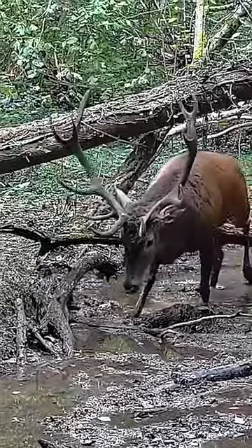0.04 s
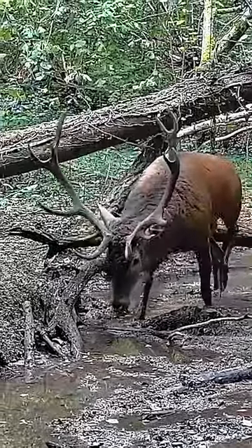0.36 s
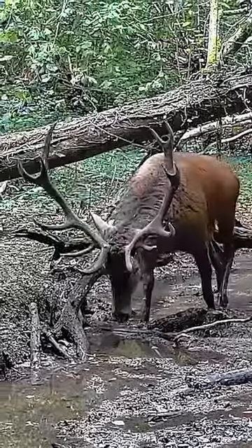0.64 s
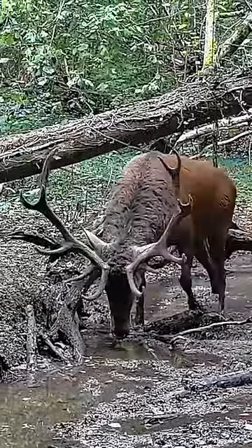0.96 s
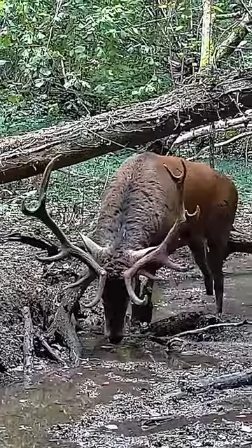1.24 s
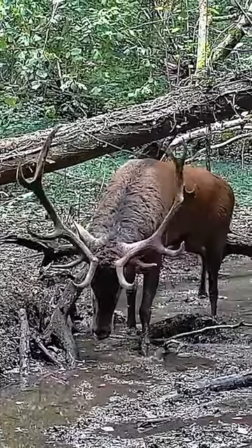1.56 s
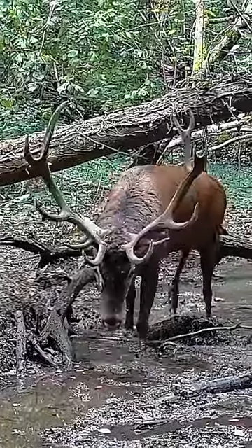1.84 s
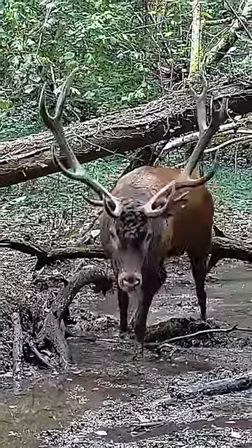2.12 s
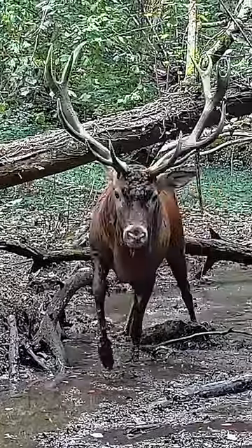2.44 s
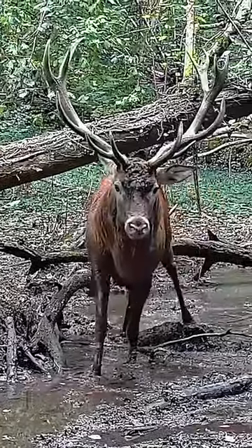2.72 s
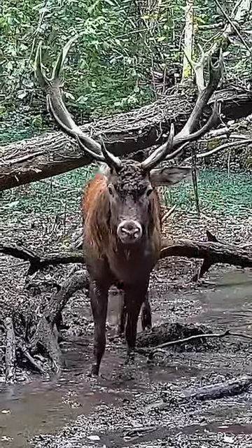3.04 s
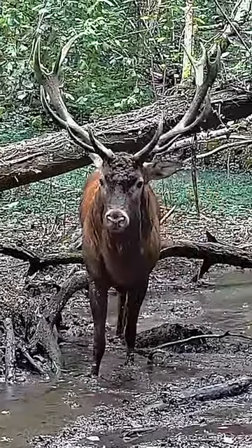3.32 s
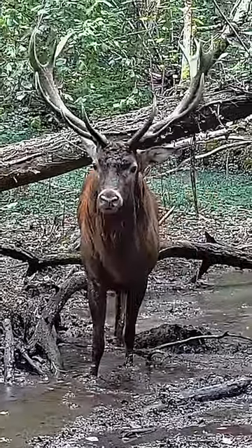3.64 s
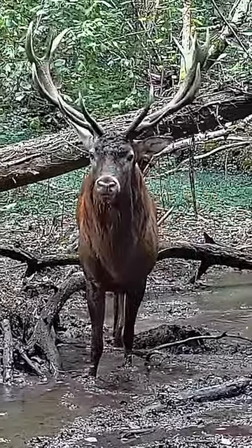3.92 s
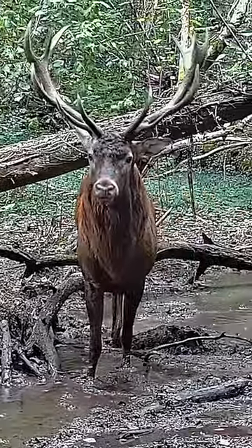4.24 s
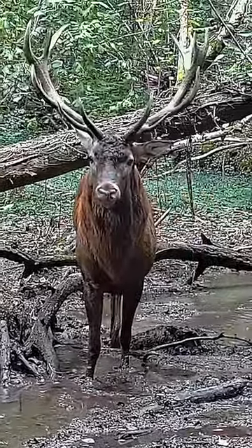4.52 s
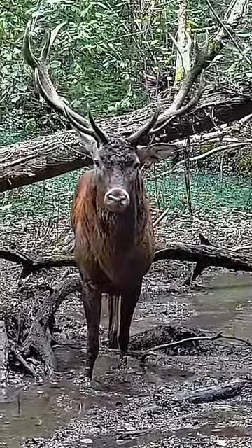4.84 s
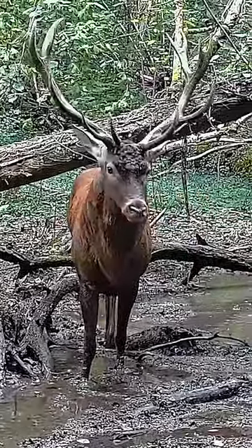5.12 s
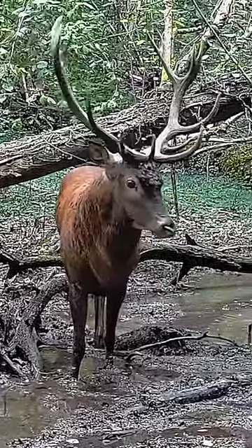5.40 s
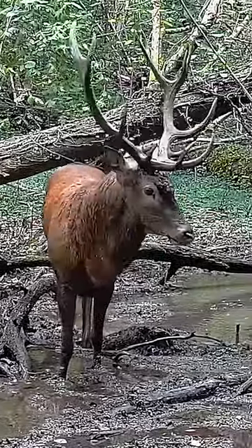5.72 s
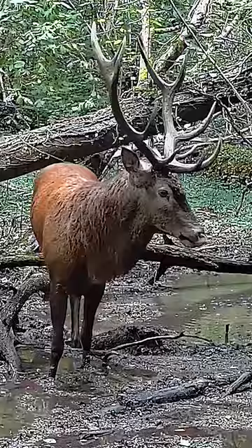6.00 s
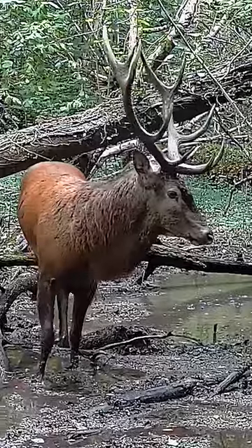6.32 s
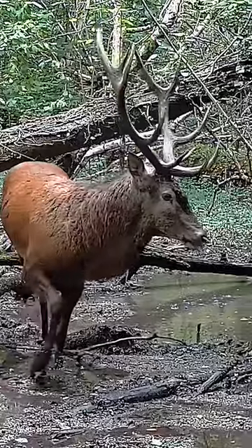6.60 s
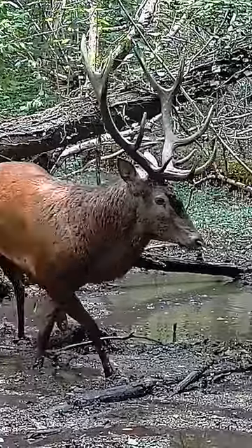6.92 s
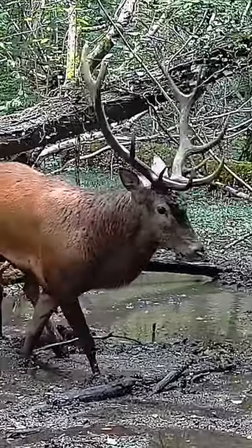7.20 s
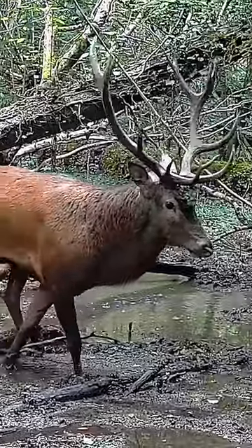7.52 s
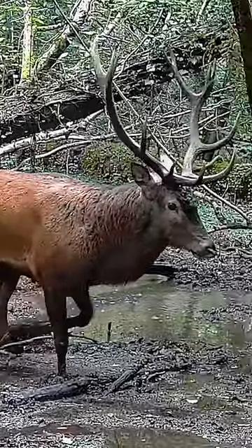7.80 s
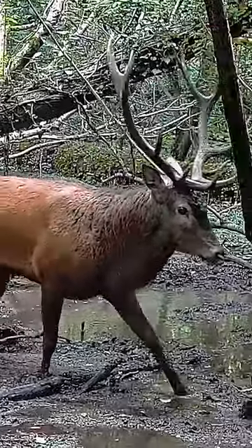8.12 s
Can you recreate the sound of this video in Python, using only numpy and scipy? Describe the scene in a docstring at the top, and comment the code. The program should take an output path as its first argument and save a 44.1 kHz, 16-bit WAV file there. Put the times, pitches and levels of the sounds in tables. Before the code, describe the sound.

A stag wades through shallow muddy water in a forest, its hooves making short wet squelches, bubbly pops and sharp smacks while droplets tick around them. After about three seconds it stands still, leaving a faint fizz of settling mud and a soft far rumble with a slight hum. Then a hoof plunges in, knocking on a sunken branch, and the squelching steps resume. The steps sound fairly close, with a slight echo off the trees.

```python
"""Over a far rumble and a faint hum, a stag wades through shallow forest mud for three seconds.
Each squelch is a cloud of small bubbles that flings spray and leaves the mud fizzing. Hooves plunge,
air pockets pop, drops tick and a flat hoof smacks, all echoing off the tree trunks.
Then the stag stands still and the mud settles. At 6.6 s it walks off,
knocking a hoof on a sunken branch as it starts."""
import sys
import numpy as np
from scipy import signal
from scipy.fft import rfft, irfft
from scipy.io import wavfile

SR = 44100
rng = np.random.default_rng(int(sys.argv[2]) if len(sys.argv) > 2 else 0)


def unload_wav(signal):
    """Save mono or channel-first audio to the path in sys.argv[1] as 16-bit WAV at rate SR, clipped to [-1, 1]."""
    wavfile.write(
        sys.argv[1],
        SR,
        np.round(np.clip(np.atleast_2d(signal).T, -1, 1) * 32767).astype(np.int16),
    )


N = 359415
TIME = np.arange(N) / SR


def undb(db):
    """Turn decibels into a number to multiply by."""
    return 10 ** (np.asarray(db) / 20)


def level(x, db):
    """Set a sound's average (rms) level."""
    return x * undb(db) / np.sqrt(np.mean(x ** 2) + 1e-20)


def curve(rows):
    """Join (time, value) rows by straight lines."""
    return np.interp(TIME, *np.transpose(rows))


def add(out, s, sound):
    """Mix a sound in at s seconds."""
    start = int(np.clip(s * SR, 0, N - 1))
    out[start:start + len(sound)] += sound[:N - start]


def colour(x, points):
    """Turn lows and highs up or down along points of f/Hz, level/dB."""
    hz, db = np.transpose(points)
    bins = np.maximum(np.fft.rfftfreq(x.shape[-1], 1 / SR), 1)
    gain = undb(np.interp(np.log(bins), np.log(hz), db))
    return irfft(rfft(x) * gain, x.shape[-1])


def wander(rate):
    """Drift by about 1 either way, to a new random value `rate` times a second."""
    knots = rng.standard_normal(N // 100)
    return np.interp(TIME * rate, np.arange(len(knots)), knots)


def bubble(hz, ring_s, glide):
    """A bubble opens and rings away, its pitch rising as it nears the surface; peak 1."""
    t = np.arange(int(7 * ring_s * SR) + 8) / SR
    pitch = np.minimum(hz * (1 + glide * np.tanh(t / ring_s / 2)), SR / 2)
    opening_s = min(1.1 / hz, ring_s / 2)
    swell = (1 - np.exp(-(t / opening_s) ** 2)) * np.exp(-t / ring_s)
    return swell / swell.max() * np.sin(2 * np.pi * np.cumsum(pitch) / SR)


def cloud(length, hz, octaves, rate, cycles, scatter_db, most=300):
    """A burst of small, varied bubbles that swells fast and fades slowly; rms 1 over its length."""
    count = int(np.clip(rate * length, 8, most))
    chance = rng.standard_normal((most, 4))
    out = np.zeros(int(length * SR) + SR // 10)
    for k, (late, pitch, size, ring) in enumerate(chance[:count]):
        place = (k + .5 + .5 * np.tanh(late)) / count
        grain_hz = hz * 2 ** (octaves * 2 * np.tanh(pitch / 2))
        grain = bubble(grain_hz, cycles * 2 ** (ring / 2) / grain_hz, glide=0.074)[:SR // 10]
        swell = np.sin(np.pi * place ** 0.43)
        # high bubbles die sooner, so they start stronger
        gain = undb(scatter_db * np.tanh(size)) * np.sqrt(swell * grain_hz / hz)
        add(out, place * length, np.sign(late) * gain * grain)
    return out / np.sqrt(np.sum(out ** 2) / (length * SR))


# how strong the rumble's lows and highs are against each other: f/Hz, level/dB
RUMBLE_TONE = [(15, -76), (25, -43), (64, -21), (79, -17.5), (92, -2), (281, -1.5), (327, -2), (362, -1),
               (391, -4.5), (456, -4), (545, -6.5), (1710, -13), (5530, -28.5), (8970, -36.5), (11000, -69),
               (14300, -89), (22000, -120)]
# how the rumble rises and falls (only the changes count): t/s, level/dB
RUMBLE_SWELL = [(0, -47), (1.5, -45.5), (3.3, -47.5), (4.8, -48.5), (6.2, -48), (8.15, -47)]
# how loud the hum is: t/s, level/dB
HUM_LEVELS = [(0, -50.5), (1.7, -58), (3.9, -53), (5.1, -63), (6.4, -67), (8.15, -52.5)]


def forest(rumble_db=-48, hum_hz=362.3):
    """A soft, far rumble with a wavering hum in it."""
    swell = curve(RUMBLE_SWELL)
    rumble = level(colour(rng.standard_normal(N), RUMBLE_TONE), rumble_db)
    pitch = hum_hz * (1 + .004 * wander(6))
    hum = np.sqrt(2) * np.sin(2 * np.pi * np.cumsum(pitch) / SR)
    rumble *= undb(swell - np.percentile(swell, 20) + 0.67 * wander(5))
    return rumble + hum * undb(curve(HUM_LEVELS) + 1.3 * wander(7))


# hooves working the mud: t/s, length/s, f/Hz, level/dB before muffling,
# splash (0 = closed suck, 1 = open splash)
SQUELCHES = [(0, 0.049, 1590, -37.5, 0.52), (.128, 0.1, 2740, -49, 0.69), (.29, 0.11, 2290, -55.5, 0.58),
             (.814, .04, 2030, -47, .1), (1.111, .07, 1540, -39, 0.22), (1.127, 0.081, 3230, -45.5, 0.15),
             (1.464, 0.057, 2680, -37, 0.98), (1.533, 0.033, 1724, -33, 0.6),
             (1.576, 0.062, 2100, -34.5, 0.56), (1.631, 0.067, 2700, -42, 0.46),
             (1.716, 0.073, 1610, -44.5, .1), (2.286, 0.057, 1770, -38.5, 0.063),
             (2.385, 0.057, 1604, -33.5, 0.12), (2.413, .02, 3080, -31, .1),
             (2.531, 0.015, 2080, -35.5, 0.32), (2.663, .016, 2580, -28.5, 0.51),
             (2.801, .028, 2120, -38.5, 0.49), (2.89, 0.064, 2370, -48.5, 0.78),
             (3.011, .12, 3350, -62, 0.48), (6.609, 0.016, 2700, -21, .45),
             (6.624, 0.042, 2280, -32.5, 0.56), (6.726, 0.017, 2540, -39.5, 0.37),
             (6.962, 0.029, 1564, -35.5, 0.81), (6.993, 0.034, 1360, -41, 0.79),
             (7.035, 0.038, 1620, -35.5, 0.36), (7.313, 0.007, 3230, -36, 0.96),
             (7.65, .012, 3520, -40.5, .8), (7.81, 0.05, 1720, -38, 0.22), (7.949, 0.086, 1700, -45, 0.39)]


def squelches(muffle_hz=4600):
    """Wet mud tears into brief bubbles, more varied in an open splash, and muffles the smallest."""
    out = np.zeros(N)
    for s, length, hz, db, splash in SQUELCHES:
        octaves = 0.17 + 0.657 * splash
        add(out, s, undb(db) * cloud(length, hz, octaves, rate=1200, cycles=3.9, scatter_db=5))
    return signal.sosfilt(signal.butter(3, muffle_hz, fs=SR, output="sos"), out)


def stirring(rest_db=-61, start_db=-50, settle_s=.45):
    """How stirred the mud is, in dB: longer, louder squelches stir it more, then it settles."""
    fade = np.exp(-TIME / settle_s)
    power = undb(rest_db) ** 2 + undb(start_db) ** 2 * fade
    for s, length, _, db, _ in SQUELCHES:
        add(power, s, length * undb(-34 + .25 * db) ** 2 * fade)
    return 10 * np.log10(power)


def fizz(ticks_per_s=5000):
    """Countless tiny bubbles fizz in the stirred mud."""
    ticks = rng.standard_normal(N) * (rng.random(N) < ticks_per_s / SR)
    hiss = colour(ticks, [(400, -34.5), (1500, 12), (3300, 11), (5000, 1.5), (7000, -2.5), (10000, -21)])
    return level(hiss, -1) * undb(stirring() + 2.6 * wander(16))


# mud pattering down from a swinging leg: t/s, length/s, average level/dB
SPATTERS = [(.216, .008, -46), (.913, 0.043, -58.5), (1.313, 0.038, -48), (1.913, 0.05, -54.5),
            (2.098, 0.0094, -53), (2.2, 0.026, -52.5), (2.256, 0.017, -48), (2.60, 0.05, -42.5),
            (2.65, .034, -38.5), (6.828, 0.03, -50.5), (7.171, .004, -51)]


def spray(drop_hz=5700):
    """Droplets flung by the splashes and shaken from the legs land with tiny ticks."""
    # spray outlasts its squelch, and a closed suck throws far less
    flung = [(s, 1.15 * length, db - 1 - 26.5 * (1 - splash)) for s, length, _, db, splash in SQUELCHES]
    out = np.zeros(N)
    for s, length, db in flung + list(SPATTERS):
        add(out, s, undb(db) * cloud(length, drop_hz, octaves=0.38, rate=2800, cycles=7.5, scatter_db=9))
    return out


# hooves sinking deep: t/s, f/Hz, peak level/dB, ring time/ms
PLUNGES = [(.001, 448, -20.5, 3.3), (6.613, 373, -27, 5.8), (6.622, 150, -32, 6.9), (6.629, 320, -22, 2.9),
           (6.965, 627, -15.5, 1.6), (6.973, 160, -27, 7.7), (6.9956, 298, -20, 3.7),
           (7.0509, 537, -19.5, 0.63)]


def plunges(slop_db=-12, slop_s=0.016, lowest_hz=95):
    """A hoof drives a big air pocket into the water, which slops shut around the leg."""
    out, t = np.zeros(N), TIME[:SR // 4]
    slop_tone = [(30, -26), (110, -3), (400, -5), (900, -33), (2500, -10.5), (8000, -43)]
    for s, hz, db, ring_ms in PLUNGES:
        slop = level(colour(rng.standard_normal(len(t)), slop_tone), slop_db)
        add(out, s, undb(db) * bubble(hz, ring_ms / 1000, glide=0.12))
        add(out, s, undb(db) * slop * np.exp(-t / slop_s))
    # a shallow puddle gives off no deep bass
    return signal.sosfilt(signal.butter(4, lowest_hz, "high", fs=SR, output="sos"), out)


# the loudest air pockets bursting in the mud: t/s, f/Hz, peak level/dB
POPS = [(.002, 1790, -19), (.170, 4200, -32), (.278, 2925, -18.5), (.827, 1920, -27.5), (.847, 1930, -27.5),
        (1.066, 603, -29), (1.101, 1730, -26.5), (1.1402, 1610, -21.5), (1.491, 1400, -25.5),
        (1.544, 1455, -17), (1.588, 5000, -24), (1.608, 3010, -20.5), (1.616, 1850, -18.5),
        (1.681, 3360, -29), (1.701, 1245, -20), (1.71, 1534, -18.5), (2.3034, 1790, -19),
        (2.365, 1500, -23.5), (2.376, 1495, -26), (2.387, 1960, -26.5), (2.409, 1470, -19.5),
        (2.419, 3190, -17), (2.534, 2650, -25.5), (2.672, 3330, -13), (2.6951, 3040, -16.5),
        (2.7092, 3370, -26), (2.7159, 3470, -6.5), (2.809, 1850, -28.5), (2.82, 2830, -24.5),
        (6.597, 4300, -30.5), (6.6126, 5840, -26), (6.620, 804, -21), (6.728, 1830, -21),
        (6.834, 2880, -22.5), (6.875, 2420, -30.5), (6.965, 1500, -21.5), (7.006, 1740, -23),
        (7.061, 1540, -23), (7.078, 4850, -28.5), (7.084, 1590, -28.5), (7.803, 2070, -29),
        (7.8266, 1310, -16), (8.019, 1070, -28), (8.060, 3740, -27.5)]


def pops(froth_db=-24, froth_s=.014, lead_s=.004):
    """Air pockets break as hooves press in and pull free; their mud skin frays just before and after."""
    out = np.zeros(N)
    for s, hz, db in POPS:
        cycles = 5.7 * (hz / 1800) ** .4  # small, high pockets ring for more cycles
        cycles *= 0.5 ** max((db + 19.5) / 18.5, 0)  # hard bursts die sooner
        add(out, s, undb(db) * bubble(hz, cycles / hz, glide=0.021))
        froth = cloud(froth_s, 0.913 * hz, octaves=0.19, rate=1500, cycles=1.72, scatter_db=8, most=40)
        add(out, s - lead_s, undb(db + froth_db) * froth)
    return out


def drips(middle_hz=2900, count=420):
    """Stray drops and lone bubbles tick all over the puddle, fading when the stag stands still."""
    out, stirred = np.zeros(N), stirring()
    calm_db = np.minimum(stirred - np.median(stirred), 0)
    for when, pitch, size, ring in rng.random((count, 4)):
        at = int(when * N)
        hz = middle_hz * 2 ** (2.4 * (pitch - .5))
        dull_db = 6 * np.log2(max(hz / middle_hz, 1))
        db = stirred[at] + 2 * calm_db[at] + 2 + 12 * size ** 2 - dull_db
        add(out, at / SR, undb(db) * bubble(hz, (2 + 4 * ring) / hz, glide=0.063))
    return out


def trunks(x, near_db=-11, near_fade_s=0.18, far_db=-19, far_fade_s=0.31):
    """Banks and logs throw back a few early echoes; standing trees add a faint tail."""
    t = TIME[:SR]
    near = rng.standard_normal(SR) ** 3 * undb(-60 * t / near_fade_s) * (t > .002)
    far = rng.standard_normal(SR) * undb(-60 * t / far_fade_s) * (1 - np.exp(-t / 0.0029))
    air = signal.butter(1, 5000, fs=SR, output="sos")
    echo = undb(near_db) * near / np.linalg.norm(near) + undb(far_db) * far / np.linalg.norm(far)
    return signal.fftconvolve(x, signal.sosfilt(air, echo))[:N]


# hooves landing flat on the wet surface: t/s, f/Hz, peak level/dB
SMACKS = [(1.476, 3130, -9.5), (6.6106, 3200, -5), (6.617, 1110, -9), (6.6632, 1680, -10),
          (7.051, 990, -19), (7.317, 6900, -17)]


def smacks(cycles=1.54):
    """Air trapped under a flat hoof escapes in one sharp snap."""
    out = np.zeros(N)
    for s, hz, db in SMACKS:
        add(out, s, undb(db) * bubble(hz, cycles / hz, glide=0.028))
    return out


# a hoof hitting the sunken branch: t/s, peak level/dB
KNOCK = (6.613, -13.5)
# the notes the branch rings with: f/Hz, relative level/dB, time to fade by 60 dB/s
BRANCH_NOTES = [(366.5, -2.5, 0.087), (849, -4, .1), (1053, 6, 0.14), (1250, -8, 0.091), (2190, -10, .1),
                (3050, -2, 0.13), (3660, -2.5, 0.065)]


def knock(contact_s=0.00055):
    """The branch takes the mud-softened blow and rings briefly."""
    out, t = np.zeros(N), TIME[:SR // 2]
    s, peak_db = KNOCK
    ring = sum(undb(db - 60 * t / fade_s) * np.sin(2 * np.pi * hz * t) for hz, db, fade_s in BRANCH_NOTES)
    ring *= 1 - np.exp(-(t / contact_s) ** 2)
    add(out, s, undb(peak_db) * ring / np.abs(ring).max())
    return out


def scene():
    """The wading stag among the trees."""
    wading = squelches() + spray() + plunges() + pops() + drips() + smacks() + knock()
    return (forest() + fizz() + wading + trunks(wading))[None]


def record(dry, bottom_hz=45, top_hz=10500):
    """The microphone drops the deepest bass, dulls the high treble and cuts off the top."""
    thin = signal.sosfilt(signal.butter(2, bottom_hz, "high", fs=SR, output="sos"), dry)
    dull = colour(thin, [(6800, -0.5), (8000, -6.0), (9500, -1.5)])
    return signal.sosfilt(signal.ellip(8, .2, 70, top_hz, fs=SR, output="sos"), dull)


dry = scene()
out = record(dry)
unload_wav(out)
```